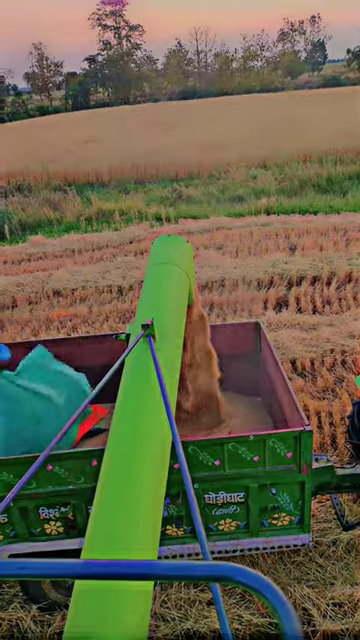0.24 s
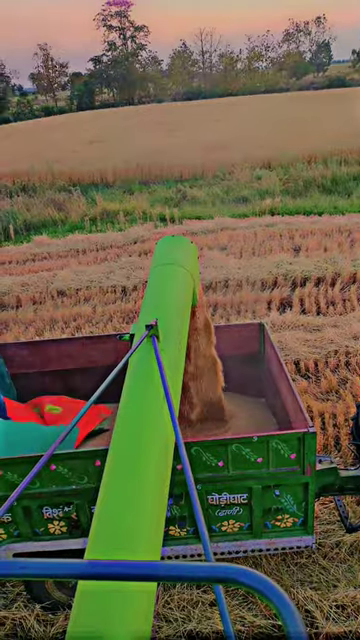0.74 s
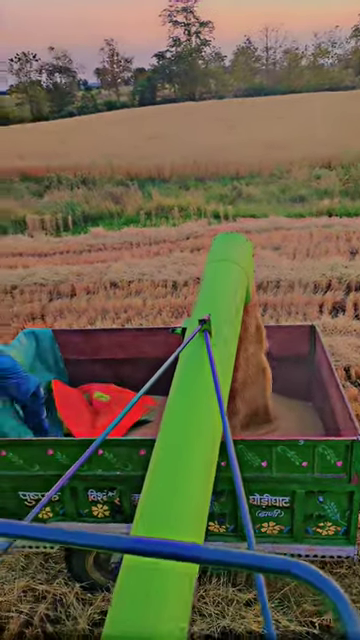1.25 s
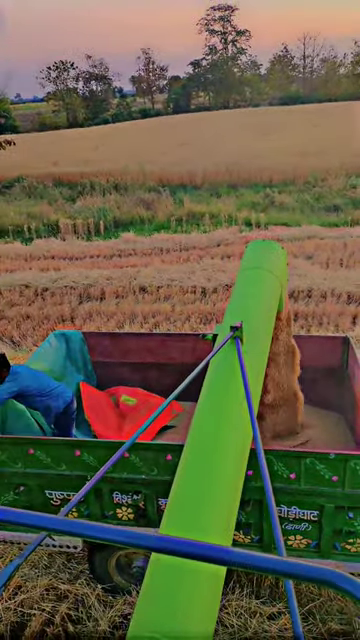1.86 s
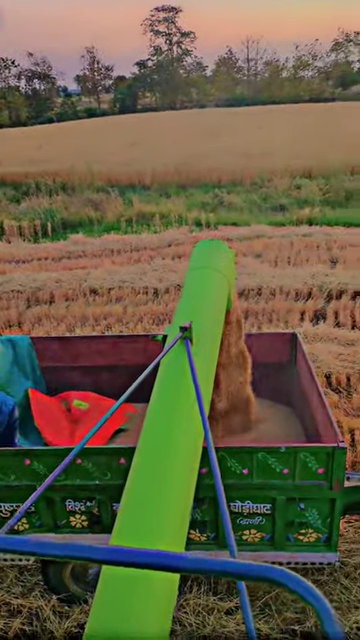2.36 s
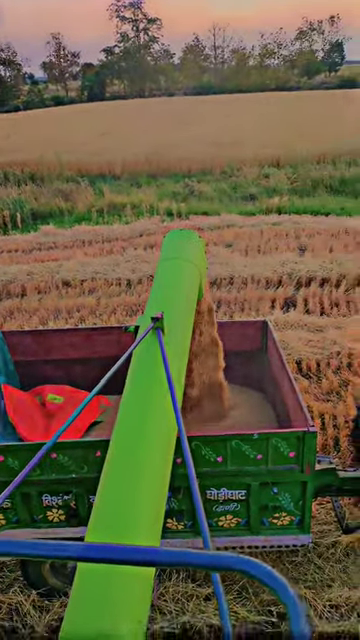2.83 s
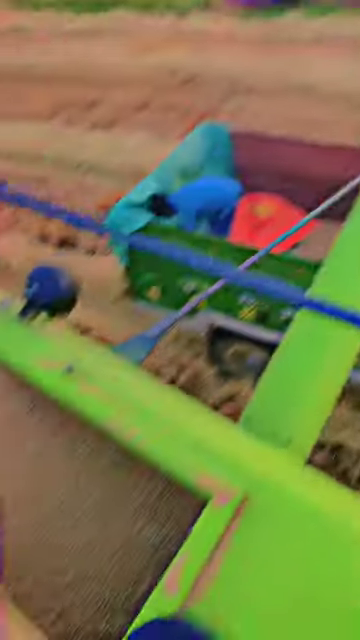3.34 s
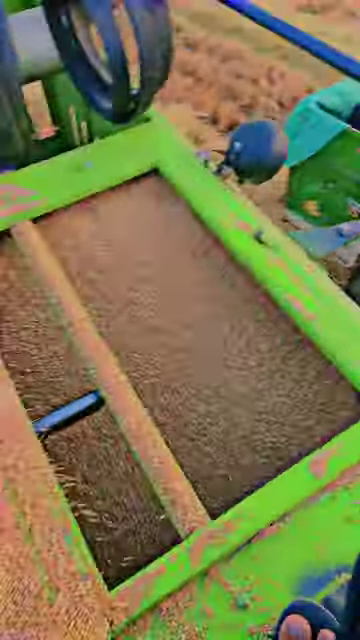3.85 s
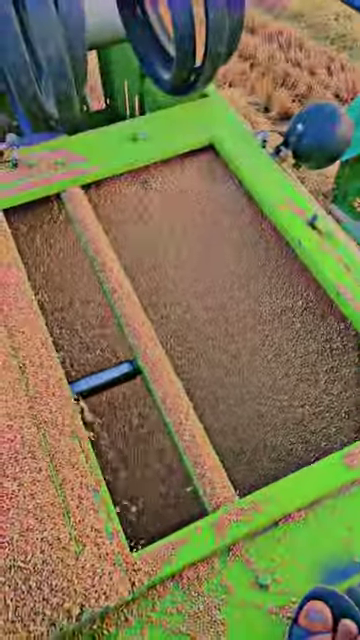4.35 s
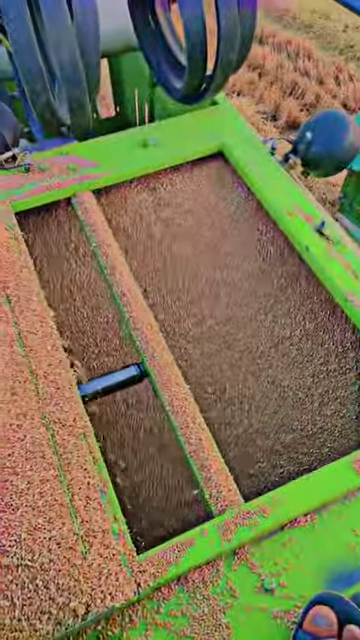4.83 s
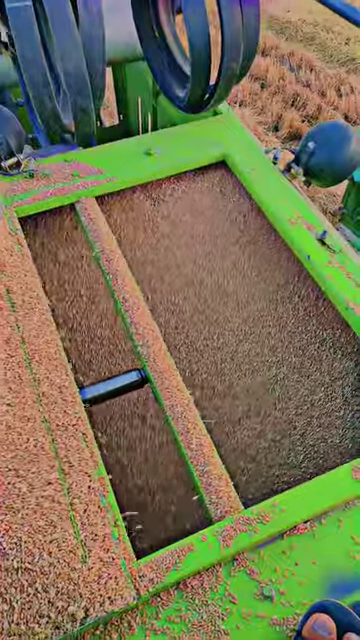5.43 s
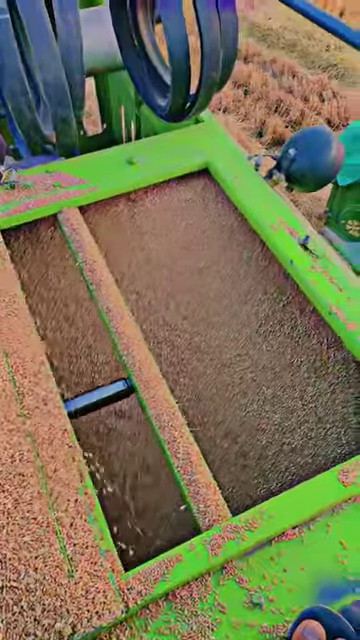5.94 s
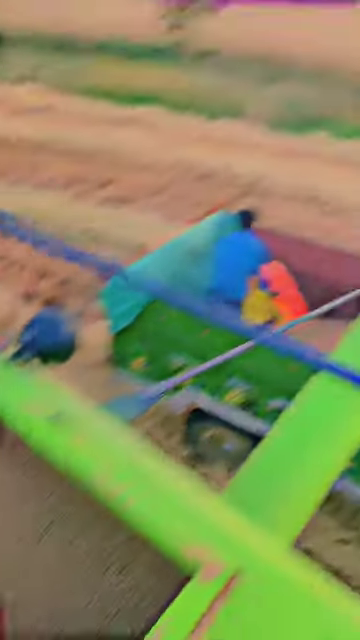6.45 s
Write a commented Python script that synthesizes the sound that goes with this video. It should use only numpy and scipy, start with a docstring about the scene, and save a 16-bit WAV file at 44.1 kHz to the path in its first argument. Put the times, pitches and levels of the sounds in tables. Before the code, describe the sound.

Grain slides through a steel auger and sprays into a trailer in quick surges, chirping and squeaking at first, over the steady diesel drone, clatter and rumble of a parked combine harvester. The close phone microphone on top of the machine swings toward the open grain tank, where the clatter softens and a hollow metallic ringing comes in. A few more squeals sound before it swings partly back toward the field.

```python
"""Combine harvester unloading grain

In a field, from a phone's microphone on top of the grain tank of a standing combine. A six-cylinder
diesel drones and clatters, the sheet-metal body rumbles, the threshing drum throbs and drives whine.
The auger pushes grain through its steel tube into a trailer in surges and squeaks now and then.
The microphone turns from the trailer to the open, hollow-ringing tank and partly back."""
import sys
import numpy as np
from scipy import signal
from scipy.fft import rfft, irfft
from scipy.io import wavfile

SR = 44100
rng = np.random.default_rng(int(sys.argv[2]) if len(sys.argv) > 2 else 0)


def store_wav(level_fs):
    """Save 16-bit WAV to argv[1]."""
    pcm = np.round(np.clip(np.atleast_2d(level_fs), -1, 1) * 32767)
    wavfile.write(sys.argv[1], SR, pcm.T.astype(np.int16))


N = 295029

CYCLE_HZ, DRUM_HZ, AUGER_HZ = 13.972, 28.9, 16.82  # four-stroke cycles, drum turns, auger turns


def undb(db):
    """Decibels to gain."""
    return 10 ** (np.asarray(db) / 20)


def unit(x):
    """Scale to rms 1."""
    return x / np.sqrt(np.mean(x ** 2))


def clock():
    """Time of every sample in seconds."""
    return np.arange(N) / SR


def walk(rate_hz):
    """Smooth random wander with a spread near 1."""
    knots = rng.standard_normal(size=4000)
    return 1.24 * np.interp(clock() * rate_hz, np.arange(len(knots)), knots)


def swell(at_s, reach_s):
    """A smooth rise and fall around at_s, reaching reach_s to either side."""
    return np.cos(np.pi / 2 * np.clip((clock() - at_s) / reach_s, -1, 1)) ** 4


def colour(x, points):
    """Filter by a (Hz, dB) outline that falls 60 dB an octave outside its ends; rms 1."""
    hz, db = np.transpose(sorted(map(tuple, points)))
    octave, marks = np.log2(np.fft.rfftfreq(N, 1 / SR) + 1), np.log2(hz)
    outside = np.abs(octave - np.clip(octave, marks[0], marks[-1]))
    response = undb(np.interp(octave, marks, db) - 60 * outside)
    return unit(irfft(rfft(x) * response, N))


def ring(x, modes):
    """Pass through (Hz, width in Hz, dB) resonances; rms 1."""
    f = np.fft.rfftfreq(N, 1 / SR) + 1
    response = sum(undb(db) / (1 + 1j * (f * f - hz * hz) / (f * width)) for hz, width, db in modes)
    return unit(irfft(rfft(x) * response, N))


def turns(hz, slip):
    """Turns made by a shaft whose speed wanders a little."""
    return hz * np.cumsum(1 + slip * walk(3.008)) / SR


def rattle(turn, hz, repeat):
    """Contact noise of a shaft: the share `repeat` of its power comes back the same on every turn."""
    size = int(SR / hz)
    pattern = np.interp(turn % 1 * size, np.arange(size), rng.standard_normal(size))
    return np.sqrt(repeat) * unit(pattern) + np.sqrt(1 - repeat) * rng.standard_normal(N)


def throb(turn, depth, lag):
    """One swell a turn, peaking lag turns in."""
    return 1 + depth * np.cos(2 * np.pi * (turn - lag))


def tone(cycles, db, waver_db):
    """A partial whose strength and phase waver as the air paths change."""
    phase = 2 * np.pi * (cycles + rng.random()) + 0.7 * walk(4)
    return np.sqrt(2) * undb(db + waver_db * walk(5)) * np.sin(phase)


def facing_tank():
    """Where the microphone points: 0 at the trailer, 1 into the open tank."""
    # the turn of the microphone: (time [s], share of the turn [0-1])
    aim = [(3.1, 0.07), (3.55, .5), (4.0, 0.83), (5.0, 1), (6.15, 1), (6.451, 0.6), (6.68, 0.5)]
    return np.interp(clock(), *np.transpose(aim))


def at_microphone(db, opening_db, early_db, ease_at_s, halfway_db, tank_db):
    """Gain of one part: opening_db drops away, early_db eases out, the rest follows the turn."""
    opening = np.interp(clock(), (.57, .74), (1, 0))
    early = np.clip(.5 - (clock() - ease_at_s) / 1.3, 0, 1)  # a 1.3 s ramp centred on ease_at_s
    turn_db = np.interp(facing_tank(), (0, .5, 1), (0, halfway_db, tank_db))
    return undb(db + opening_db * opening + early_db * early + turn_db)


def knocks():
    """Soft blows through the deck: one short push and rebound each."""
    # dull knocks: (time [s], level [dB])
    blows = [(.458, -32), (0.604, -24.5)]
    out = np.zeros(N)
    for at_s, db in blows:
        u = (clock() - at_s) / 0.0013
        out -= undb(db) * 2 * u * np.exp(-u * u)
    return out


def tank():
    """Sinking grain and the machine's shaking make the steel bin below the microphone ring hollow."""
    # resonances of the tank: (frequency [Hz], width [Hz], relative level [dB])
    modes = [(677, 150, 1), (758, 96, -5.5), (1123, 195, -2), (2360, 425, -10), (2650, 140, -18.5)]
    # tones that carry from the open tank: (frequency [Hz], level against the ringing [dB])
    tones = [(664.2, -13.5), (736.2, -17)]
    shake = rng.standard_normal(N) * throb(DRUM_HZ * clock(), depth=.08, lag=0.84) * undb(.5 * walk(14))
    hollow = np.zeros(N)
    for hz, width, db in modes:
        mode = [(hz, width, 0)]
        hollow += undb(db) * np.sqrt(width) * ring(ring(shake, mode), mode)  # twice: the gaps stay dark
    hum = sum(tone(hz * clock(), db, waver_db=0) for hz, db in tones)
    return undb(-33) * facing_tank() * (unit(hollow) + hum)


def panels(body_gain):
    """The shaken sheet-metal body rumbles, lumpy at the engine's cycle."""
    # spectrum of the body: (frequency [Hz], relative level [dB])
    body_colour = [(32, -70), (55, -50.5), (67, -41), (107, -16), (157, -9), (220, -5), (258, 0), (301, -3),
                   (341, -1.5), (410, -8), (461, -7.5), (508, -15.5), (560, -13.5), (730, -46),
                   (1230, -120)]
    lumps = throb(CYCLE_HZ * clock(), depth=.06, lag=0.44)
    shake = rng.standard_normal(N) * lumps * undb(0.26 * walk(19))
    deep = colour(rng.standard_normal(N), [(20, 5), (60, 2), (90, -14)])
    return body_gain * (undb(-1.36) * colour(shake, body_colour) + undb(-54.5) * deep)


def thresher(drum_gain):
    """The drum throbs once a turn; loose guards ring, pulsing with the engine's cycle; drives whine."""
    # spectrum of the drum: (frequency [Hz], relative level [dB])
    drum_colour = [(500, -6), (580, -9), (700, -3), (825, -3.5), (880, -4.5), (940, -4), (1020, 1),
                   (1140, 0.5), (1250, -4.5), (1450, -7.5)]
    # resonances of the guards: (frequency [Hz], width [Hz], relative level [dB])
    guard_modes = [(793, 17, -5), (829.5, 30, 7), (1014, 25, 3), (1110, 26, -11.5)]
    # belts, gears and bearings: (frequency [Hz], relative level [dB])
    whines = [(192.5, -44), (331.7, -47), (338.5, -38.5), (347.2, -41), (1508.7, -54.5), (1832, -60),
              (3407, -67), (3613, -67.5), (3774, -67.5), (3994, -68.5), (4131, -68.5), (4191, -68.5)]
    engine_cycle = turns(CYCLE_HZ, slip=0.00045)
    drum_throb = throb(DRUM_HZ * clock(), depth=.12, lag=0.93)
    beat = rattle(engine_cycle, CYCLE_HZ, repeat=0.086) * drum_throb * undb(0.3 * walk(22))
    shake = rng.standard_normal(N) * throb(engine_cycle, depth=0.21, lag=0.62) * undb(1.3 * walk(18))
    guard_gain = at_microphone(-36.5, opening_db=4, early_db=-3, ease_at_s=1.2,
                               halfway_db=-2.5, tank_db=-7.5)
    guards = guard_gain * ring(shake, guard_modes)
    whine = sum(tone(hz * clock(), db, waver_db=1.2) for hz, db in whines)
    return undb(-1) * drum_gain * colour(beat, drum_colour) + guards + undb(2) * whine


def diesel(body_gain, drum_gain):
    """Engine orders over injector and valve clatter that pulses with the six firings of each cycle."""
    # engine tones: (order [multiple of the four-stroke cycle], relative level [dB])
    orders = [(6, -61), (8, -55.5), (10, -39), (11, -42), (12, -32), (18, -38.5), (39, -49), (40, -49),
              (42, -53.5), (45, -45), (63, -55.5), (74, -49), (77, -52.5), (81, -48), (84, -48.5),
              (88, -57), (90, -45.5), (93, -49.5), (98, -47.5), (104, -55)]
    # spectrum of the clatter: (frequency [Hz], relative level [dB])
    clatter_colour = [(1340, -4.5), (1500, -0.5), (1570, -1), (1675, 2.5), (1760, -2), (1830, 1),
                      (1930, -5.5), (2100, 2), (2220, -4.5), (2400, -8.5)]
    cycle = turns(CYCLE_HZ, slip=0.00054)
    low_gain, high_gain = unit(body_gain), unit(drum_gain)
    drone = sum(tone(k * cycle, db, waver_db=1.3) * (low_gain if k < 60 else high_gain)
                for k, db in orders)
    firing = throb(6 * cycle, depth=0.13, lag=0.71)
    clatter = rattle(cycle, CYCLE_HZ, repeat=0.16) * firing * undb(0.6 * walk(20))
    clatter_gain = at_microphone(-37.1, opening_db=3, early_db=3.5, ease_at_s=2.5,
                                 halfway_db=-0.9, tank_db=-6)
    return undb(-3) * drone + clatter_gain * colour(clatter, clatter_colour)


def stick_slip(hz):
    """Rough squeal of steel on steel, sticking and slipping."""
    slipping = undb(3 * walk(130) - 1)
    pitch = hz * (1 + .008 * walk(300))
    return slipping * tone(np.cumsum(pitch) / SR, 0, waver_db=-0.5)


def squeaks():
    """The auger flight chirps against its tube on every second turn; now and then it squeals louder."""
    # single squeals of the tube: (time [s], pitch [Hz], half length [s], level [dB])
    squeals = [(0.503, 2960, 0.06, -34.5), (1.573, 3040, .04, -40), (2.945, 4600, .054, -50),
               (3.312, 4570, .075, -48), (3.55, 4590, 0.051, -46.5), (3.755, 3030, 0.24, -44),
               (6.172, 4570, 0.055, -50)]
    times = np.arange(.338, N / SR, 2 / AUGER_HZ)
    levels_db = np.where(times < 1.23, -48.5, -58.5)  # a clear run at first, faint afterwards
    rubbing = sum(undb(db) * swell(at_s, reach_s=.045) for at_s, db in zip(times, levels_db))
    chirps = rubbing * undb(-walk(AUGER_HZ / 2)) * stick_slip(hz=4570)
    return chirps + sum(undb(db) * swell(at_s, reach) * stick_slip(hz) for at_s, hz, reach, db in squeals)


def kernels(per_s, spread_db):
    """Countless kernel impacts of uneven size."""
    hit = rng.random(N) < per_s / SR
    return hit * rng.standard_normal(N) * undb(spread_db * rng.exponential(size=N))


def auger(body_gain):
    """Each turn of the screw shoves grain along the ringing tube and throws it out; the drive hums."""
    # hum of the drive: (order [multiple of the auger turn], relative level [dB])
    orders = [(20, -51), (21, -44), (22, -41.5), (23, -49.5), (24, -50.5)]
    # spectrum of grain sliding in the tube: (frequency [Hz], relative level [dB])
    tube_colour = [(2300, -5), (2480, -6.5), (2660, -3), (2770, -0.5), (3080, -1.5), (3400, -3), (3620, -6),
                   (3760, -9.5), (3880, -14)]
    # that scraping at the microphone: (time [s], relative level [dB])
    scrape_levels = [(0.26, -31.5), (0.6, -34), (0.62, -37), (1.73, -38), (2.51, -48), (3.01, -47.5),
                     (3.69, -44.5), (6.68, -46)]
    # spectrum of the thrown grain: (frequency [Hz], relative level [dB])
    spray_colour = [(3300, -31.5), (3900, -6), (4050, 0.5), (4400, 6.5), (4750, 4.5), (5100, -0.5),
                    (5800, -2), (6500, -1.5), (6950, -9), (7300, -36), (7700, -43.5)]
    # resonances of the tube: (frequency [Hz], width [Hz], relative level [dB])
    tube_modes = [(2990, 35, 3), (3615, 25, 0), (4135, 20, -5), (4190, 20, -5), (4365, 30, -2),
                  (4415, 25, 1), (4585, 45, 0), (4925, 35, -2), (5275, 40, -4)]
    turn = turns(AUGER_HZ, slip=.0003)
    surge = throb(turn, depth=.115, lag=.56)
    hum = unit(body_gain) * sum(tone(k * turn, db, waver_db=3.1) for k, db in orders)
    sliding = colour(kernels(per_s=20000, spread_db=1.1) * np.sqrt(surge), tube_colour)
    scrape = undb(np.interp(clock(), *np.transpose(scrape_levels))) * sliding
    thrown = colour(kernels(per_s=14000, spread_db=0.5) * surge * undb(.5 * walk(22)), spray_colour)
    steel = ring(rattle(turn, AUGER_HZ, repeat=0.12) * surge, tube_modes)
    spray_gain = at_microphone(-49.5, opening_db=5, early_db=2.2, ease_at_s=2, halfway_db=0.5, tank_db=0)
    spray = spray_gain * (undb(-3) * thrown + undb(-3.5) * steel)
    return undb(0.5) * hum + undb(-0.7) * scrape + spray


def scene():
    """The running machine in mono, from the top of its grain tank."""
    body_gain = at_microphone(-27, opening_db=2, early_db=0, ease_at_s=2, halfway_db=0.3, tank_db=1.16)
    body_gain *= undb(4.1 * swell(at_s=.545, reach_s=0.088))  # the rumble swells once
    drum_gain = at_microphone(-33, opening_db=2.45, early_db=5.5, ease_at_s=1.95,
                              halfway_db=3, tank_db=-3)
    machine = diesel(body_gain, drum_gain) + panels(body_gain) + thresher(drum_gain) + knocks()
    unloading = auger(body_gain) + tank() + squeaks()
    return (machine + unloading)[None]


def record(dry):
    """The phone's microphone opens abruptly and passes little above the middle treble."""
    open_s, top_hz = .251, 7330
    opened = np.clip((clock() - open_s) / .003, 0, 1)
    lowpass = signal.ellip(10, .2, 80, top_hz, fs=SR, output="sos")
    return signal.sosfilt(lowpass, dry * opened)


dry = scene()
out = record(dry)
store_wav(out)
```